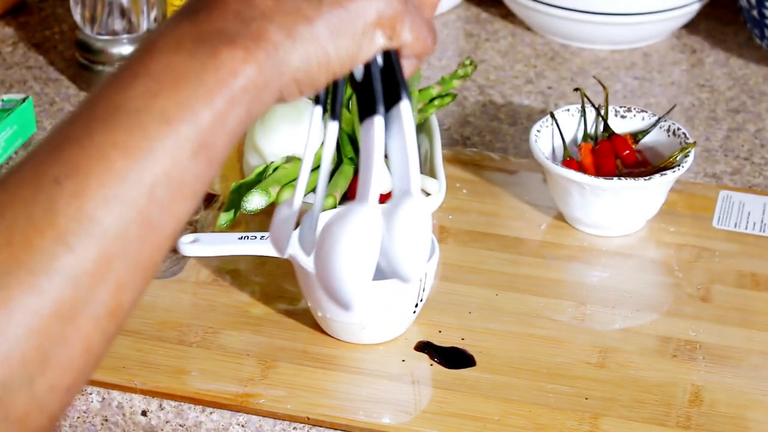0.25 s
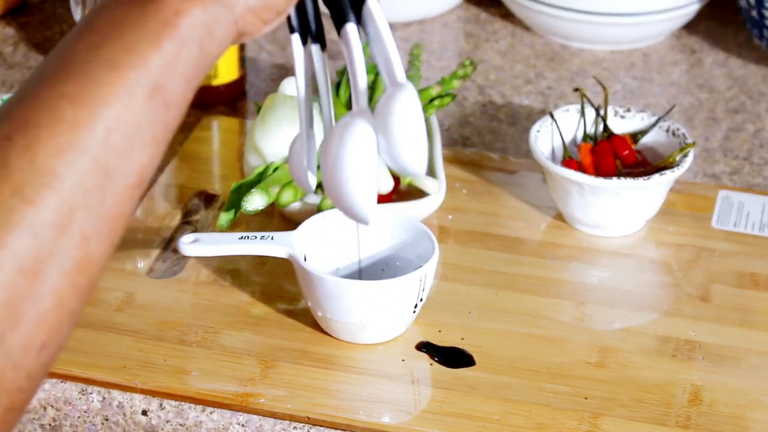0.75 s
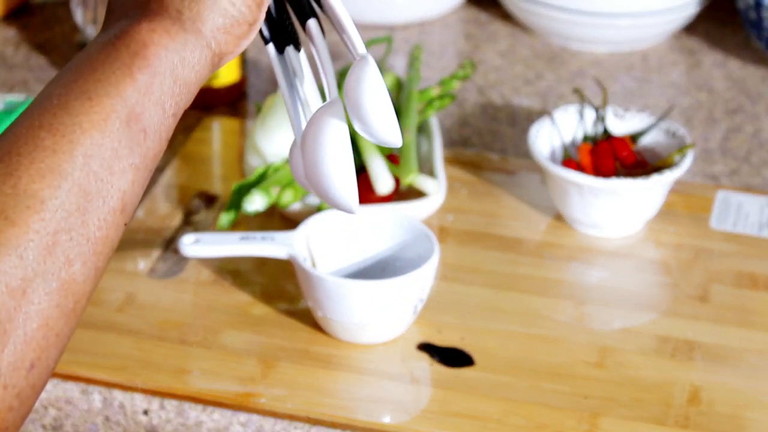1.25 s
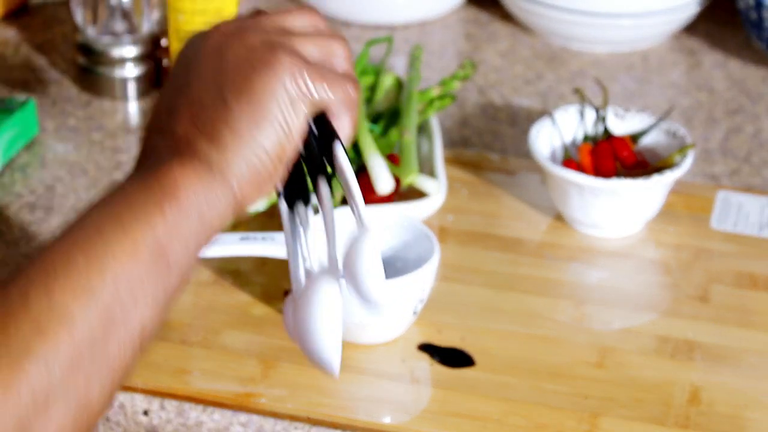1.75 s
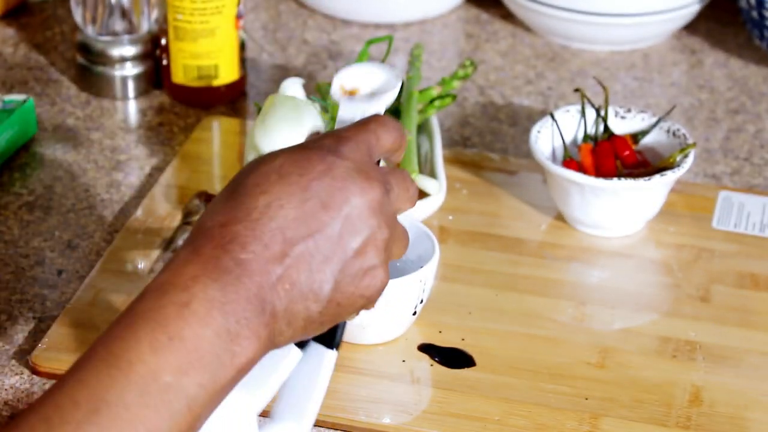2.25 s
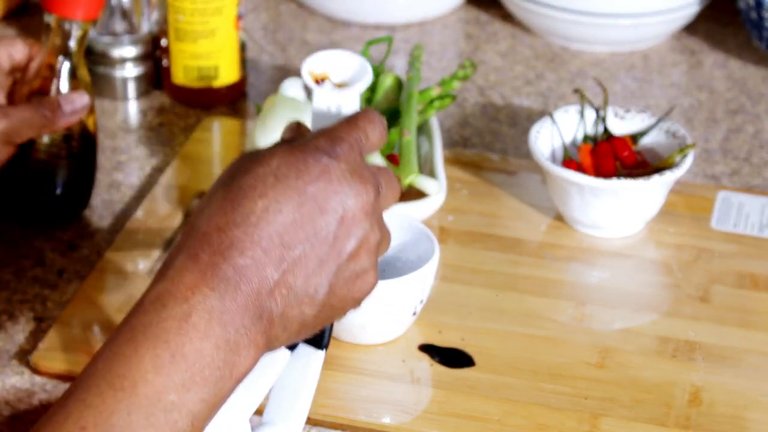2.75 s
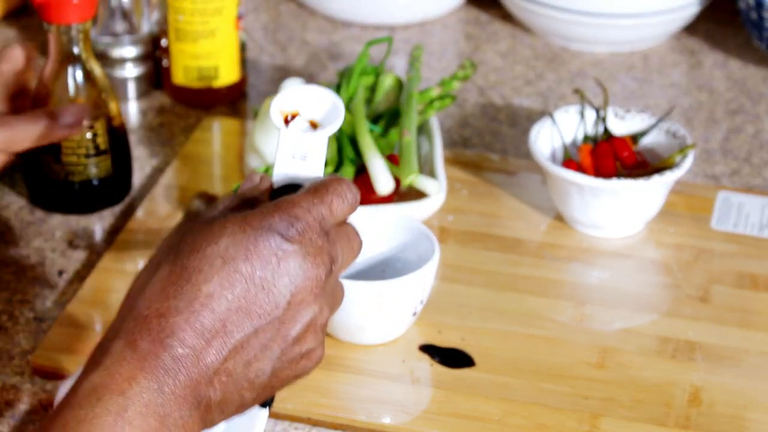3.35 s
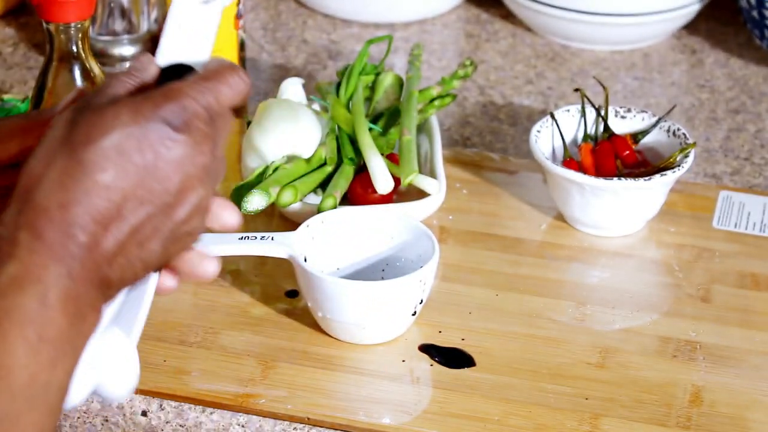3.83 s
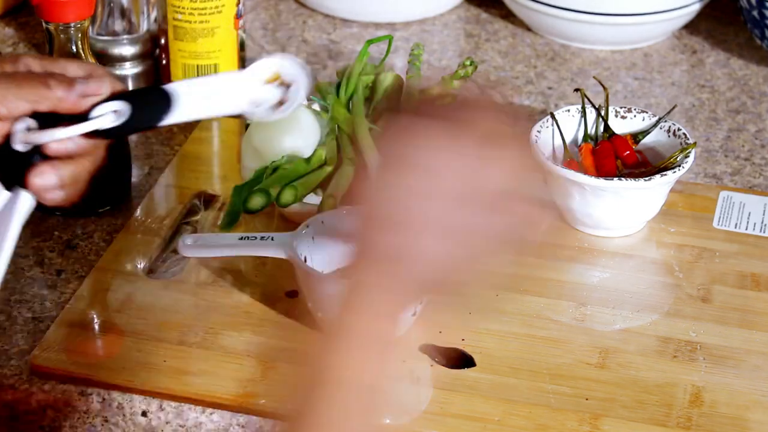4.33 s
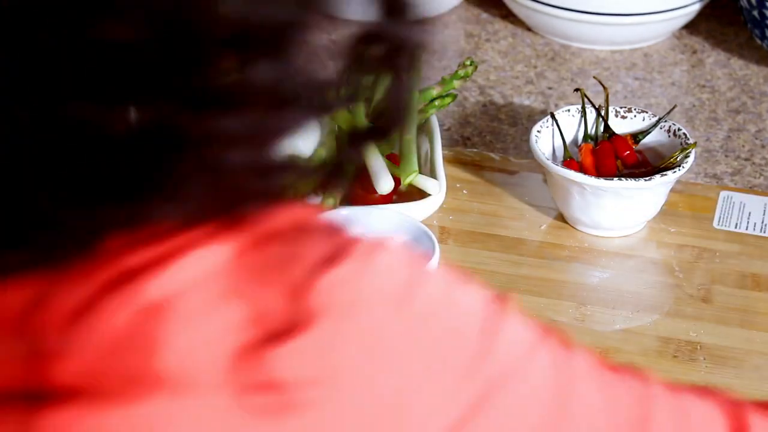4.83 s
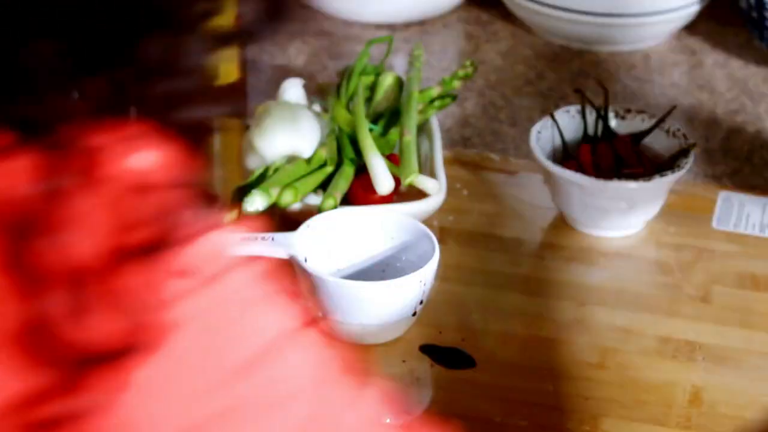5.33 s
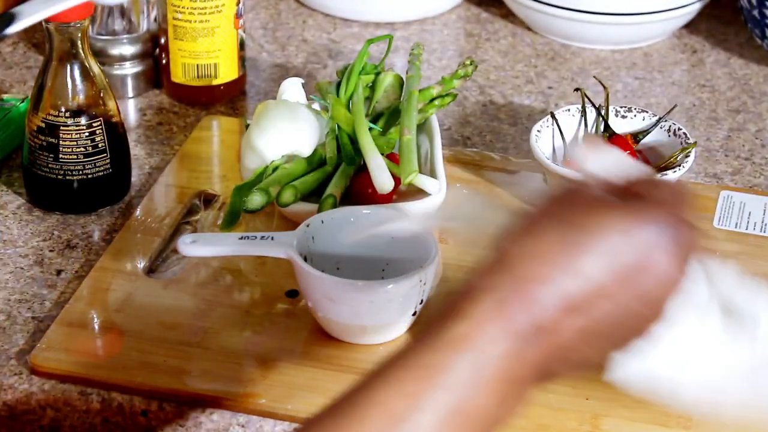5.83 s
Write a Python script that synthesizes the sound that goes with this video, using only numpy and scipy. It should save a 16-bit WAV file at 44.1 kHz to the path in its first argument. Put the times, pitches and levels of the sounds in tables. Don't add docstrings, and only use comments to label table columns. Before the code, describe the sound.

Close stereo pickup in a small, lively kitchen over quiet room tone and fridge hum. Hollow plastic spoons knock and slide together in sparse little clusters. Midway, a heavy bottle bangs down, wobbles with a low tone and bangs down again. A rapid glassy clatter follows, slightly left. Finally a sleeve brushes past, an arm bumps the counter softly, and a few spoon clicks and a low wavering rub end it.

```python
import sys
import numpy as np
from scipy import signal
from scipy.io import wavfile
from scipy.ndimage import uniform_filter1d

SR = 44100
rng = np.random.default_rng(int(sys.argv[2]) if len(sys.argv) > 2 else 0)


def natural_amplitude(level_db):
    exponent = np.asarray(level_db, float) / 20
    return 10 ** exponent


def wrap_up_sound(samples):
    columns = np.atleast_2d(samples).T
    tamed = np.clip(columns, -1, 1)
    steps = np.round(tamed * 32767).astype(np.int16)
    wavfile.write(sys.argv[1], SR, steps)


N = 268392

# (frequency [Hz], density [dB per Hz])
AIR_SPECTRUM = [(15, -47), (25, -9.5), (120, -5.5), (242, -4), (270, -4), (363, 2), (405, 0), (451, -22),
                (545, -9), (734, 5), (962, -16.5), (1790, -13), (2110, -15.5), (9070, -22.5),
                (16000, -30.5)]
# (frequency [Hz], width [Hz], level [dB])
FRIDGE_MODES = [(200, 50, -70.5), (296, 19, -95), (534, 44, -63), (814.7, 10, -66), (1018, 41, -65.5)]
# (frequency [Hz], likeness [0-1])
FAR_LIKENESS = [(60, 0.32), (180, 0.71), (550, 0.82), (1650, 0.28), (4970, 0.021), (15000, 0.021)]
# (frequency [Hz], likeness [0-1])
NEAR_LIKENESS = [(100, 1), (600, 0.95), (1200, 0.75), (2500, 0.21), (5000, 0.14), (12000, 0.085)]
# (frequency [Hz], T60 [s])
ROOM_T60 = [(100, 0.93), (400, 0.41), (1200, 0.4), (4000, 0.31), (12000, 0.21)]
# (frequency [Hz], level [dB])
ROOM_COLOUR = [(100, -9.5), (200, -5.5), (350, -1.5), (1000, 2.5), (10000, 1.5)]
# (time [s], level [dB])
RUSTLE_LEVEL = [(4.28, -76), (4.45, -65.5), (4.55, -63), (4.656, -62), (4.784, -58.5), (5.142, -63),
                (5.344, -65.5), (5.476, -58), (5.596, -57.5), (5.924, -65.5), (6.086, -74)]
# (frequency [Hz], density [dB per Hz])
CLOTH_SPECTRUM = [(150, -7), (400, -4.5), (1000, -9), (2500, -9.5), (6000, -18), (11000, -24.5),
                  (16000, -43)]
# (time [s], pitch [Hz], level [dB])
RUB_PATH = [(5.42, 306, -55.5), (5.684, 276, -63), (5.708, 315.5, -60.5), (5.884, 293.6, -57.5),
            (5.908, 303, -86), (5.924, 276, -69), (6.0, 300, -62), (6.032, 339, -58), (6.086, 350, -51)]
# (time [s], peak [dB], hardness [dB], length [s])
ARM_BUMPS = [
    (4.2235, -30, 18, 0.012),
    (4.693, -35, -29, 0.032),
    (4.714, -30.5, -6.5, 0.043),
    (4.803, -27.5, 7, 0.046),
    (4.95, -42, 4, 0.075),
    (5.418, -36.5, -4.5, 0.1),
    (4.73, -35, -19, 0.047),
    (4.75, -42, -20, 0.055),
    (4.82, -34.5, 14, 0.034),
]
# (frequency [Hz], width [Hz], level [dB])
ARM_MODES = [(91, 190, 0.5), (173, 110, 0), (272, 380, 5), (418, 43, 3.5), (588, 220, 7), (986, 60, 7.5),
             (1260, 170, 3), (2200, 780, -16), (4000, 2500, -8)]
# (time [s], peak [dB], colour [dB], length [s])
JAR_JINGLE = [
    (2.802, -28.5, -4, 0.25),
]
# (frequency [Hz], width [Hz], level [dB])
JAR_MODES = [(2660, 350, -3), (3070, 350, -1), (3650, 200, 8), (4030, 1000, 4), (5010, 690, 5.5),
             (5570, 170, 11), (6300, 330, -7), (7000, 2000, -10), (7730, 310, 12), (7200, 250, -21),
             (10130, 360, 4.5), (13000, 2200, -3)]
# (time [s], pitch [Hz], level [dB])
ROCK_PATH = [(2.94, 261, -45), (2.97, 254, -37.5), (2.984, 297, -43), (3.03, 298, -37.5),
             (3.044, 269, -36.5), (3.076, 294, -39), (3.086, 294, -46), (3.124, 281.4, -40),
             (3.148, 303, -33.5), (3.158, 312, -49), (3.17, 307, -38.5), (3.21, 337, -41)]
# (frequency [Hz], width [Hz], level [dB])
ROLL_MODES = [(235, 40, -7.5), (334, 56, -9), (497, 100, -5.5)]
# (time [s], peak [dB], hardness [dB], length [s])
BOTTLE_BOUNCES = [
    (2.822, -18.5, -15, 0.15),
    (2.921, -27.5, -2, 0.073),
    (3.256, -20, -10, 0.064),
    (3.338, -32, -7, 0.065),
    (2.8, -17, 5, 0.028),
    (3.22, -11, 16, 0.022),
]
# (frequency [Hz], width [Hz], level [dB])
COUNTER_MODES = [(89, 62, -8), (122, 34, -3.5), (210, 46, -12), (273, 54, -1), (306, 38, 9), (350, 27, 5),
                 (410, 29, 8), (482, 53, 12.5), (550, 37, 11.5), (587.5, 12, 13.5), (690, 58, 11),
                 (819, 66, 13), (922, 33, 9), (1000, 69, 4), (1160, 45, 5), (1300, 160, 9), (1550, 140, -4),
                 (1805, 240, 1), (2040, 180, 2), (2450, 220, -10), (2800, 500, -5), (4200, 1200, -15),
                 (6560, 2500, -15), (10400, 4700, -15)]
# (time [s], peak [dB], tilt [dB per octave])
FIRST_LANDING = [
    (2.7992, 2, 2),
    (2.8022, -1.5, -1),
    (2.8085, -14, -3),
    (2.829, -24.5, -6),
    (2.843, -19, -0.5),
    (2.929, -16, -1.5),
    (2.9, -25, 5),
    (3.14, -30.5, -0.5),
]
# (time [s], peak [dB], tilt [dB per octave])
SECOND_LANDING = [
    (3.2188, -7.5, 3.5),
    (3.2245, -12, 2),
    (3.2275, -7.5, 0),
    (3.2345, -12.5, -0.5),
    (3.2432, -11, 1),
    (3.2525, -19, -2),
    (3.259, -15, -0.5),
    (3.279, -31, 0),
    (3.338, -26, -1),
]
# (frequency [Hz], T60 [s], level [dB])
FIRST_SPOT_MODES = [(122, 0.097, -20.5), (220, 0.09, -15), (271, 0.12, -14), (350, 0.064, 0.5),
                    (410, 0.062, -6), (475, 0.068, -2), (537, 0.14, -18), (587.3, 0.096, -2.5),
                    (658, 0.13, -8), (700, 0.062, -2.5), (807, 0.062, -7), (917, 0.062, -8.5),
                    (1010, 0.13, -15), (1110, 0.063, -18), (1315, .04, -15), (1568, 0.045, -15),
                    (1780, 0.035, -14), (2060, 0.024, -8.5), (2520, 0.028, -21)]
# (frequency [Hz], T60 [s], level [dB])
SECOND_SPOT_MODES = [(123.4, .1, -19.5), (197, 0.087, -14.5), (262, 0.074, -17), (350, 0.17, -5.5),
                     (385, 0.11, -12), (476, 0.072, -1.5), (574, .13, -8), (684, 0.086, -7.5),
                     (810, 0.061, -7), (963, 0.048, -8.5), (1065, 0.062, -14), (1150, 0.058, -11.5),
                     (1345, 0.037, -9.5), (1591, 0.042, -13.5), (1866, .04, -17), (2104, 0.024, -11),
                     (2530, 0.024, -18.5), (2950, 0.026, -24.5), (3590, 0.02, -25)]
# (time [s], peak [dB], ring [dB])
GLASS_CLACKS = [(3.884, -30.5, -19), (3.898, -14.5, -10.5), (3.9015, -17, -3), (3.904, -14.5, -7),
                (3.9073, -16, -4), (3.9135, -23, -13), (3.9224, -25, -8), (3.933, -6, 4), (3.9349, -14, 2),
                (3.938, -6.5, -0.5), (3.95, -10, 11), (3.9548, -10, 10), (3.969, -18.5, 9),
                (3.9746, -26, 6), (3.989, -31, 8), (4.0106, -31, 16)]
# (frequency [Hz], width [Hz], level [dB])
GLASS_MODES = [(1170, 240, -2), (1440, 1240, 8), (2094, 53, 8), (3000, 74, -0.5), (3250, 330, -2),
               (3460, 270, 3), (3800, 210, -11), (3150, 720, 8.5), (4230, 720, 1), (4790, 240, -2),
               (5765, 100, 10.5), (5980, 77, 0), (6040, 92, -5), (5340, 710, -10), (7600, 490, 3),
               (9400, 3200, 7), (10870, 130, 5.5), (12300, 440, -6), (14600, 2100, -9)]
# (time [s], peak [dB], ring [dB])
BUNCH_CLATTER = [(4.093, -23.5, -24.5), (4.101, -23.5, -24), (4.105, -18.5, -9), (4.112, -21, -2),
                 (4.1174, -13.5, 13), (4.1208, -19.5, 2), (4.127, -23, 3), (4.135, -29, -9),
                 (4.147, -32, -11), (4.162, -35, -10), (4.1861, -27, -8), (4.198, -30, 4)]
# (frequency [Hz], width [Hz], level [dB])
BUNCH_MODES = [(988, 160, -3.5), (1520, 670, 2), (2370, 490, 5.5), (2910, 500, 1), (3120, 1400, 2),
               (4230, 240, 2), (4680, 500, 5.5), (5000, 72, -26), (5800, 170, 0), (7620, 970, 5),
               (9300, 1800, -6), (10900, 570, 1), (12600, 300, -8)]
# (time [s], peak [dB], brightness [dB], length [s])
RING_TICKS = [(0.1535, -45, 42, 0.011), (0.4863, -48, 8, 0.013), (0.6492, -38, -24, 0.022),
              (0.917, -30, -23, 0.0024), (0.9215, -45, -13, 0.0049), (1.03, -51, 7, 0.0052),
              (2.7995, -27.5, -5, 0.028), (3.2195, -39.5, 5, 0.018), (4.1215, -29, 21, 0.0059),
              (4.2514, -44, -7, 0.012), (4.2835, -44, -4, 0.012), (4.8678, -42, -15, 0.054)]
# (time [s], peak [dB], brightness [dB], length [s])
RING_SNAPS = [
    (2.4595, -42.5, -3, 0.02),
    (3.8437, -30, 6, 0.046),
]
# (frequency [Hz], width [Hz], level [dB])
RING_MODES = [(4050, 4100, -15), (4900, 980, 5), (6270, 780, 14), (7970, 2800, -12.5), (11530, 1700, -10),
              (12200, 5900, -2)]
# (time [s], peak [dB], brightness [dB], length [s])
SPOON_KNOCKS = [(0.4928, -30, 10, .03), (0.504, -31, -1, 0.025), (0.513, -31, -3, .045),
                (0.675, -30, 4, 0.029), (0.685, -31, 5, 0.035), (0.763, -31, 8, 0.032),
                (0.775, -30.5, -1, 0.021), (0.783, -29.5, -3, 0.035), (1.626, -28.5, 2, 0.042),
                (1.637, -33, 1, 0.058), (2.4943, -27, 5.5, .061), (4.6031, -31.5, 5, 0.069),
                (5.4965, -27.5, 3, 0.071)]
# (time [s], peak [dB], bowl ring [dB], length [s])
SPOON_RATTLES = [(0.028, -35.5, -10, 0.024), (0.131, -46, -28, 0.071), (0.157, -37, 4, 0.032),
                 (0.271, -43, 0, 0.03), (0.538, -40.5, 4, 0.028), (0.567, -35, 13, 0.03),
                 (0.706, -40.5, -11, 0.053), (0.795, -36, 10, 0.049), (0.8335, -34.5, 16, 0.038),
                 (0.952, -35.5, 0, 0.035), (1.068, -41.5, 13, 0.012), (1.265, -43, 10, 0.014),
                 (1.665, -42, -6, 0.039), (1.703, -38.5, -5, 0.019), (1.8093, -37.5, -4, 0.049),
                 (1.929, -42.5, -33, 0.037), (1.95, -38, 4, 0.03), (2.075, -39, -3, 0.049),
                 (2.513, -35.5, 13, 0.074), (2.568, -35, 13, 0.036), (2.6735, -41.5, 0, 0.032),
                 (3.494, -35.5, -7, 0.047), (3.621, -37, -5, 0.039), (3.739, -36, -5, 0.056),
                 (4.888, -39.5, -3, 0.03), (5.247, -33.5, 15, 0.042), (5.355, -36, -2, 0.039),
                 (5.562, -33, -8, 0.044), (5.639, -36, -5, 0.036), (5.698, -42.5, -20, 0.029)]
# (frequency [Hz], width [Hz], level [dB])
SPOON_MODES = [(820, 66, -3.5), (998, 26, -3.5), (1180, 420, 2.5), (1530, 200, -2), (1749, 144, 1),
               (2075, 53, 3.5), (2416, 50, -2), (2620, 120, -2), (2895, 43, 3), (3440, 220, 9),
               (3910, 200, 9.5), (4460, 170, 7), (6820, 920, 11), (8400, 3300, 11), (13340, 10000, 1)]

RINGING, BRIGHT, HARD = (-0.094, 0.41, 0.27), (0, 0, 1), (-0.49, 0.78, 0.7)
GLASSY, CRISP = (-0.61, 0.92, 0.5), (-0.58, 0, 0.28)
GLASS_PARTS_HZ = (2400, 4100, 7000)


def rms_one(x):
    return x / np.sqrt(np.mean(x ** 2) + 1e-20)


def in_time(rows):
    times, *columns = np.transpose(rows)
    return [np.interp(np.arange(N) / SR, times, column) for column in columns]


def while_on(rows):
    t = np.arange(N) / SR
    return np.clip(np.minimum(t - rows[0][0], rows[-1][0] + 0.02 - t) / 0.02, 0, 1)


def at_hz(points, hz):
    table_hz, values = np.array(points).T
    return np.interp(np.log(hz), np.log(table_hz), values)


def drift(rate_hz):
    step = 40
    r = np.exp(-2 * np.pi * rate_hz * step / SR)
    noise = rng.standard_normal(N // step + 2002)
    slow = signal.lfilter([1], [1, -2 * r, r * r], noise)[2000:]
    return np.interp(np.arange(N) / step, np.arange(len(slow)), rms_one(slow))


def spread(mid, side, hz, likeness):
    alike = np.clip(at_hz(likeness, hz), 0, 1)
    shared, apart = np.sqrt(1 + alike) * mid, np.sqrt(1 - alike) * side
    return np.array([shared + apart, shared - apart]) / np.sqrt(2)


def resonate(x, hz, width):
    r = np.exp(-np.pi * width / SR)
    gain = np.sqrt((1 - r * r) / 2)
    poles = [1, -2 * r * np.cos(2 * np.pi * hz / SR), r * r]
    return signal.lfilter(gain * np.array([1, 0, -1]), poles, x)


def bands(likeness, size=N):
    edges = 22 * 2 ** np.arange(0, 9.6, 0.5)
    white = rng.standard_normal((2, 2, size))
    for k, (low, high) in enumerate(zip(edges, edges[1:])):
        band = signal.butter(2, [low, high], "band", fs=SR, output="sos")
        mid, side = signal.sosfilt(band, white[k % 2])
        centre = np.sqrt(low * high)
        yield centre, spread(mid, side, centre, likeness)


def hiss(spectrum, patchy_db):
    together = drift(1.0)
    total = 0
    for hz, noise in bands(FAR_LIKENESS):
        flicker_db = patchy_db * (0.65 * together + drift(6.8))
        total = total + natural_amplitude(at_hz(spectrum, hz) + flicker_db) * noise
    return rms_one(total)


def contacts(events, body, parts_hz, tone_db, follows, rise_share, grain_db, jump=0):
    size = SR // 4
    out = np.zeros((2, N + size))
    luck = rng.standard_normal((len(events), 3 * size + 2 * len(body)))
    for (start, peak_db, colour_db, length), row in zip(events, luck):
        low_db, upper_db, top_db = np.array(tone_db) + colour_db * np.array(follows)
        t = np.arange(min(size, int((1.3 * length + 0.09) * SR))) / SR
        mid, side, sizes = row[:3 * size].reshape(3, size)[:, :len(t)]
        rise = rise_share * length
        fall_db = -60 * np.clip((t - rise) / length, 0, 3) ** 2
        swell = np.clip(jump + t / rise, 0, 1) * natural_amplitude(fall_db)
        clumps = uniform_filter1d(sizes, SR // 900) * np.sqrt(SR // 900)
        force = swell * natural_amplitude(grain_db * (0.7 * sizes + 0.9 * clumps))
        sound = 0
        for (hz, width, level_db), chance, grip in zip(body, *row[3 * size:].reshape(2, -1)):
            part_db = (low_db, 0, upper_db, top_db)[np.searchsorted(parts_hz, hz)]
            hz = hz * (1 + 0.015 * grip)
            ring = resonate(spread(mid, side, hz, NEAR_LIKENESS) * force, hz, width)
            ring = ring * np.sqrt(2 * np.sum(force ** 2) / np.sum(ring ** 2))
            ring = resonate(ring, hz, 1.5 * hz)
            sound = sound + natural_amplitude(level_db + part_db + 2.0 * chance) * ring
        at = round(start * SR)
        out[:, at:at + len(t)] += natural_amplitude(peak_db) * sound / np.abs(sound.mean(axis=0)).max()
    return out[:, :N]


def blows(events, body):
    contact_s, ear_phase = 0.00041, 1.1
    t = np.arange(SR // 3) / SR
    out = np.zeros((2, N + len(t)))
    hz, t60, level_db = np.transpose(body)[:, :, None]
    unlike = ear_phase * np.sqrt(1 - np.clip(at_hz(NEAR_LIKENESS, hz), 0, 1))
    luck = rng.uniform(-1.01, 1, (len(events), 3, len(body), 1))
    for (start, peak_db, tilt_db), (phase, ear, chance) in zip(events, luck):
        mode_db = level_db + tilt_db * np.log2(hz / 500) + 2 * chance
        size = natural_amplitude(mode_db - 60 * t / t60) * (1 - np.exp(-t / contact_s))
        turn = 2 * np.pi * hz * t + np.pi * phase
        sound = np.array([np.sum(size * np.sin(turn + sign * unlike * ear / 2), axis=0) for sign in (1, -1)])
        at = round(start * SR)
        out[:, at:at + len(t)] += natural_amplitude(peak_db) * sound / np.abs(sound.mean(axis=0)).max()
    return out[:, :N]


def room_air():
    return natural_amplitude(-55.5) * hiss(AIR_SPECTRUM, patchy_db=1.47)


def fridge():
    mid, side = rng.standard_normal((2, N))
    hum = 0
    for hz, width, level_db in FRIDGE_MODES:
        hum = hum + natural_amplitude(level_db) * resonate(spread(mid, side, hz, FAR_LIKENESS), hz, width)
    return hum


def kitchen(x):
    t, tail = np.arange(SR // 2) / SR, 0
    settle = 9000
    for hz, noise in bands(NEAR_LIKENESS, size=settle + len(t)):
        dying = noise[:, settle:] * natural_amplitude(-60 * t / at_hz(ROOM_T60, hz))
        power = np.sum(dying ** 2, axis=1, keepdims=True)
        tail = tail + natural_amplitude(at_hz(ROOM_COLOUR, hz)) * dying * np.sqrt(power.mean() / power)
    tail = rms_one(tail) * np.clip((t - 0.004) / 0.008, 0, 1) / np.sqrt(len(t))
    return signal.fftconvolve(x.mean(axis=0)[None], tail, axes=1)[:, :N]


def sleeve_rustle():
    level_db = in_time(RUSTLE_LEVEL)[0] + 7.5
    return natural_amplitude(level_db) * while_on(RUSTLE_LEVEL) * hiss(CLOTH_SPECTRUM, patchy_db=-2.0)


def low_rub():
    hz, level_db = in_time(RUB_PATH)
    tone = np.sin(2 * np.pi * np.cumsum(hz * (1 + 0.0227 * drift(20.9))) / SR)
    return np.sqrt(2) * natural_amplitude(level_db + 1.8 * drift(38.0)) * while_on(RUB_PATH) * tone


def arm_bumps():
    return contacts(ARM_BUMPS, ARM_MODES, (300, 800, 1800), (-1.5, 1, -20), HARD,
                    rise_share=0.06, grain_db=2.0, jump=0.6)


def jar_jingle():
    return contacts(JAR_JINGLE, JAR_MODES, (3500, 5000, 9000), (4.5, -5.5, -3.5), RINGING,
                    rise_share=0.03, grain_db=3.0)


def bottle_rocking():
    hz, level_db = in_time(ROCK_PATH)
    wobble = np.sqrt(2) * natural_amplitude(2.0 * drift(30.0))
    roll = wobble * np.sin(2 * np.pi * np.cumsum(hz * (1 + 0.024 * drift(25.0))) / SR)
    for mode_hz, width, mode_db in ROLL_MODES:
        rumble = resonate(rng.standard_normal(N), mode_hz, width)
        roll = roll + natural_amplitude(mode_db) * rms_one(resonate(rumble, mode_hz, 2 * width))
    return natural_amplitude(level_db) * while_on(ROCK_PATH) * roll


def bottle_thuds():
    blunt = contacts(BOTTLE_BOUNCES, COUNTER_MODES, (300, 900, 3500), (-3, -0.5, -17), RINGING,
                     rise_share=0.2, grain_db=3.0)
    blunt = signal.sosfilt(signal.butter(2, 3800, fs=SR, output="sos"), blunt)
    landings = blows(FIRST_LANDING, FIRST_SPOT_MODES) + blows(SECOND_LANDING, SECOND_SPOT_MODES)
    return blunt + signal.sosfilt(signal.butter(2, 70, "high", fs=SR, output="sos"), landings)


def glass_clacks():
    clack_s, touch_s = 0.008, 0.015
    strikes = [(*row, clack_s) for row in GLASS_CLACKS]
    touches = [(*row, touch_s) for row in BUNCH_CLATTER]
    clacks = contacts(strikes, GLASS_MODES, GLASS_PARTS_HZ, (-13, 1, -7.5), GLASSY,
                      rise_share=0.03, grain_db=2.5, jump=1)
    clatter = contacts(touches, BUNCH_MODES, GLASS_PARTS_HZ, (-13, -3.5, -9), GLASSY,
                       rise_share=0.05, grain_db=3.5, jump=0.5)
    return (clacks + clatter) * natural_amplitude(np.array([[0.45], [-0.45]]))


def ring_ticks():
    parts_hz = (4500, 7000, 9000)
    ticks = contacts(RING_TICKS, RING_MODES, parts_hz, (-13.5, 27.5, 9), BRIGHT, rise_share=0.04, grain_db=3.0)
    snaps = contacts(RING_SNAPS, RING_MODES, parts_hz, (53, -46, 19), BRIGHT, rise_share=0.04, grain_db=3.0)
    return ticks + snaps


def spoon_rattle():
    parts_hz = (1400, 2550, 3250)
    slide_lead = 0.22
    slides = [(start - slide_lead * length, peak_db, ring_db, length)
              for start, peak_db, ring_db, length in SPOON_RATTLES]
    knocks = contacts(SPOON_KNOCKS, SPOON_MODES, parts_hz, (-2.5, 1.5, -13.5), CRISP,
                      rise_share=0.12, grain_db=4.5, jump=0.75)
    rattles = contacts(slides, SPOON_MODES, parts_hz, (-3, 3.5, -20), RINGING,
                       rise_share=0.42, grain_db=2.5, jump=0.1)
    return knocks + rattles


def scene():
    background = room_air() + fridge() + sleeve_rustle()
    bumps, jars, thuds = arm_bumps(), jar_jingle(), bottle_thuds()
    clacks, ticks, spoons = glass_clacks(), ring_ticks(), spoon_rattle()
    near = spoons + ticks + clacks + thuds + jars + bumps + bottle_rocking() + low_rub()
    send = natural_amplitude(-20) * spoons + ticks + natural_amplitude(-1.5) * clacks
    send = send + natural_amplitude(-8.5) * thuds + natural_amplitude(-9.0) * (bumps + jars)
    lean_db = np.array([[-1.0], [1.0]])
    return (near + kitchen(send) + background) * natural_amplitude(lean_db)


def band_limit(x):
    return signal.sosfilt(signal.butter(12, 16640, fs=SR, output="sos"), x)


def record(dry):
    rounded = 1.02 * np.tanh(dry / 1.02)
    top_cut = signal.cheby2(12, 60, 16200, fs=SR, output="sos")
    return band_limit(signal.sosfilt(top_cut, rounded))


dry = scene()
out = record(dry)
wrap_up_sound(out)
```